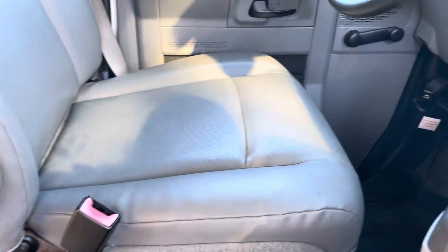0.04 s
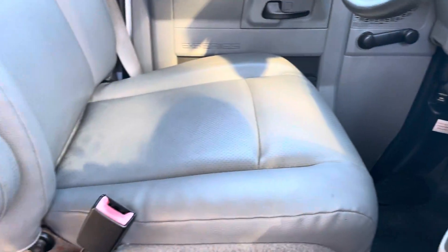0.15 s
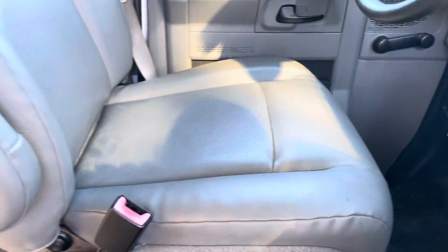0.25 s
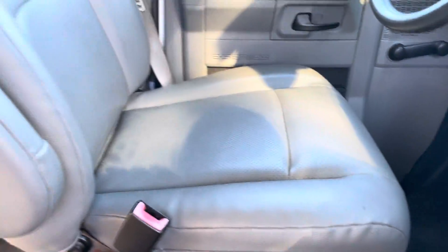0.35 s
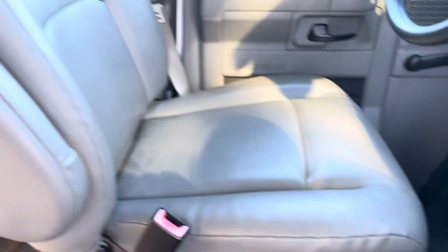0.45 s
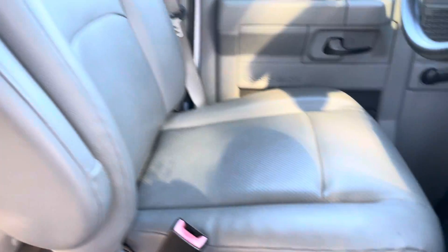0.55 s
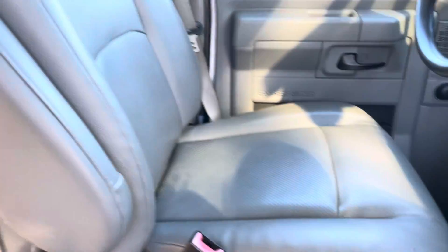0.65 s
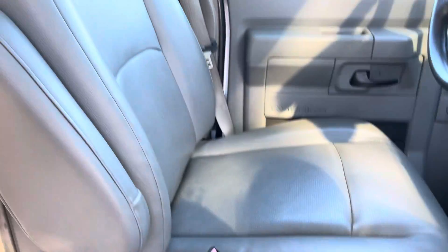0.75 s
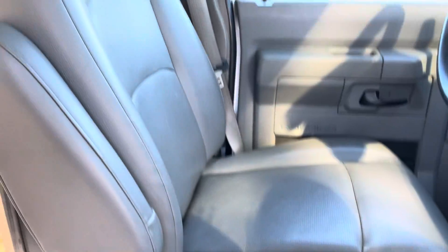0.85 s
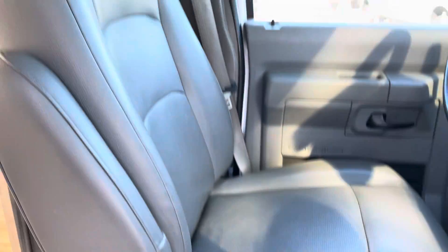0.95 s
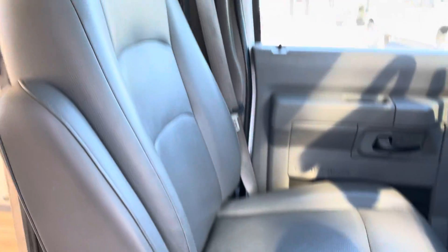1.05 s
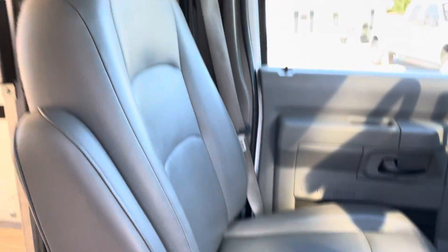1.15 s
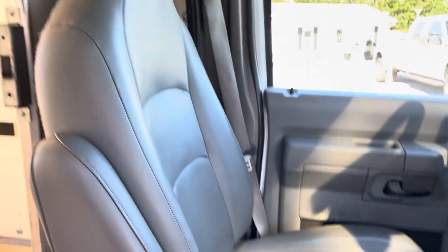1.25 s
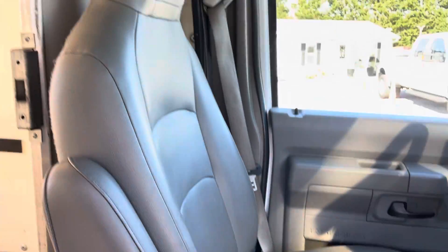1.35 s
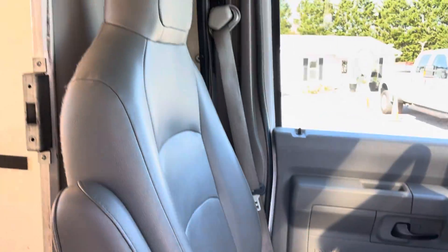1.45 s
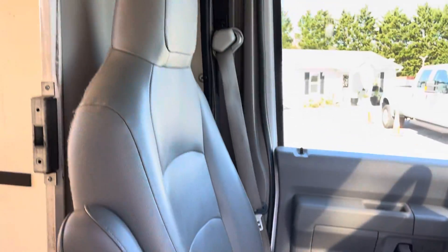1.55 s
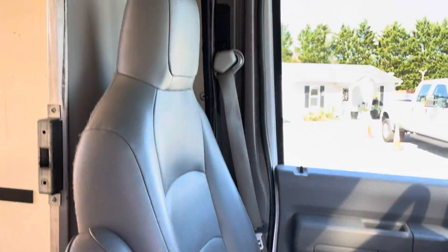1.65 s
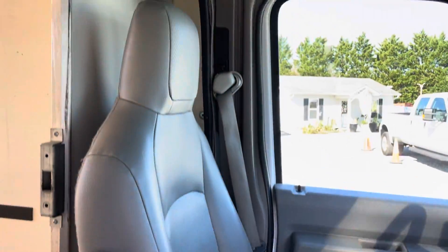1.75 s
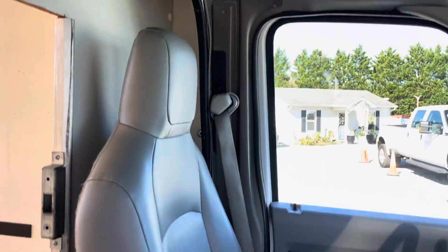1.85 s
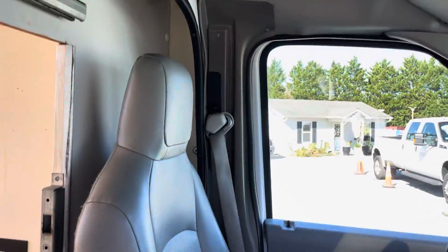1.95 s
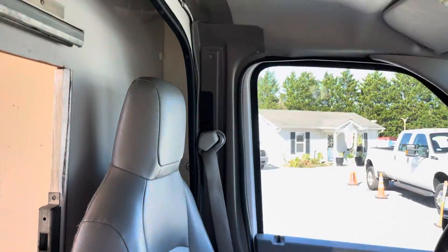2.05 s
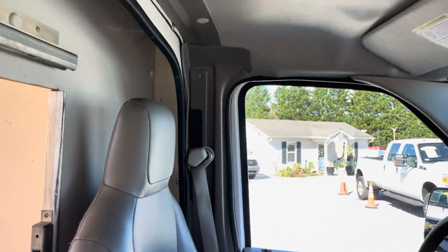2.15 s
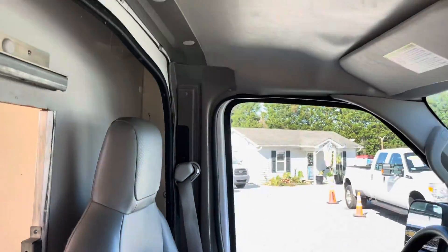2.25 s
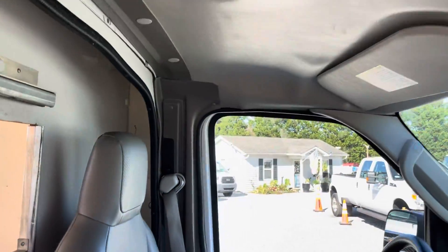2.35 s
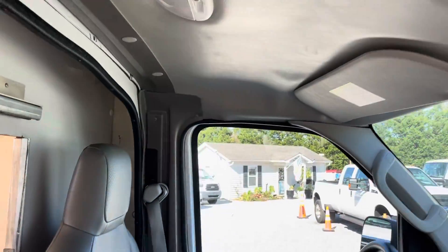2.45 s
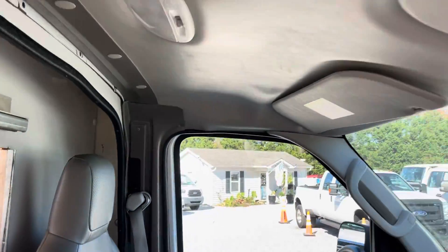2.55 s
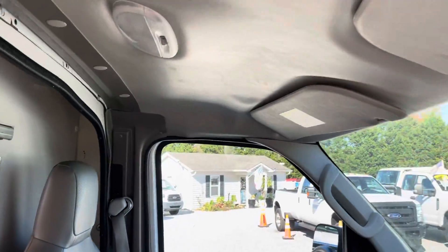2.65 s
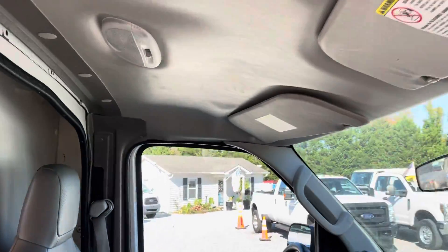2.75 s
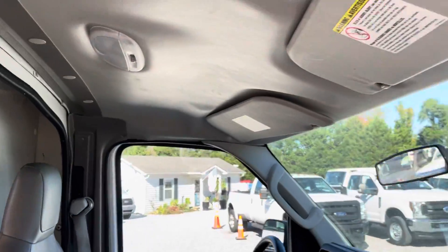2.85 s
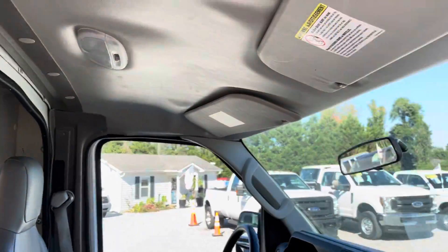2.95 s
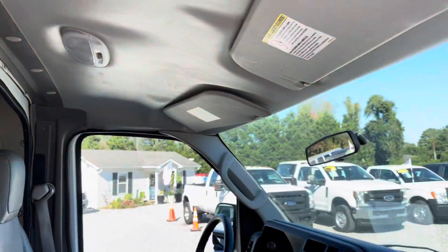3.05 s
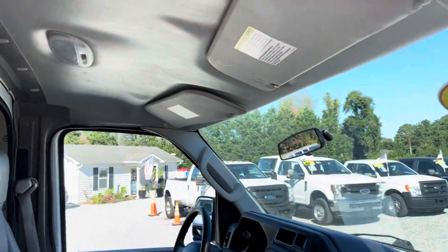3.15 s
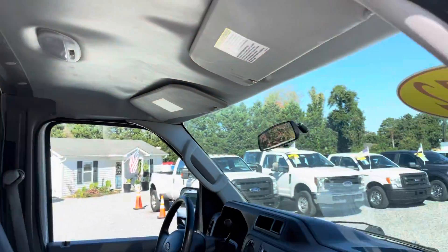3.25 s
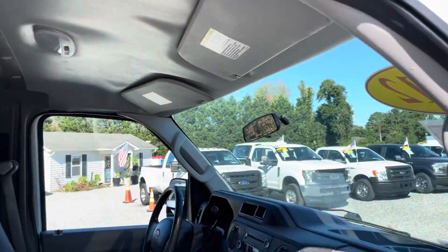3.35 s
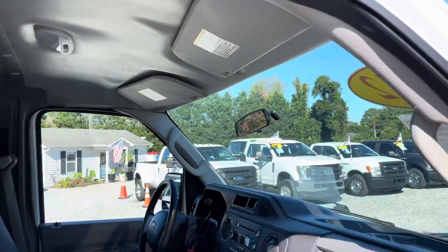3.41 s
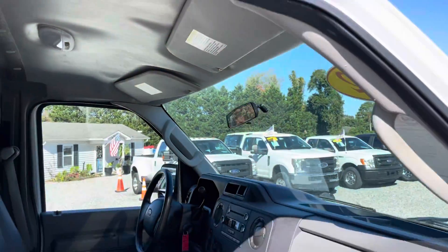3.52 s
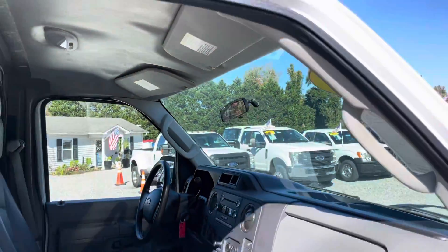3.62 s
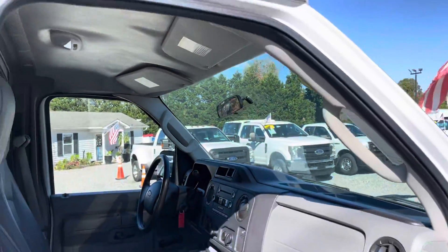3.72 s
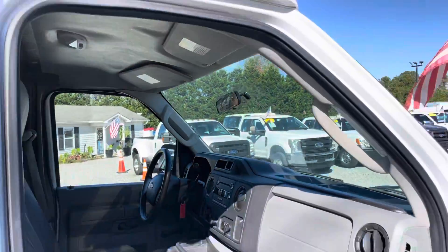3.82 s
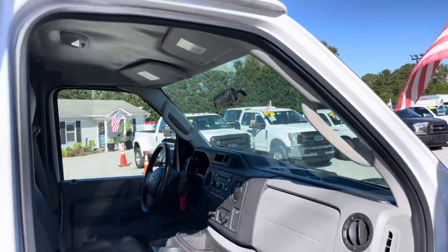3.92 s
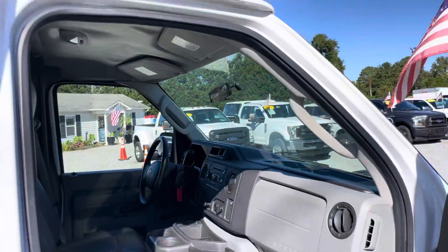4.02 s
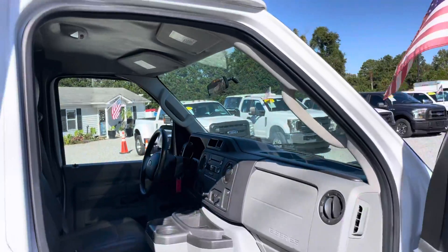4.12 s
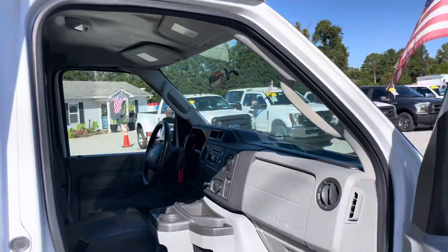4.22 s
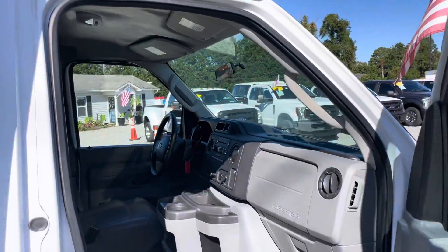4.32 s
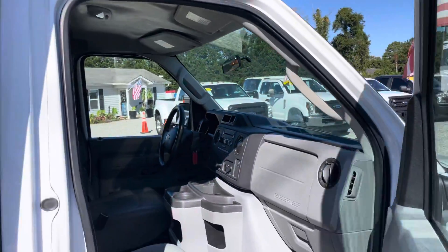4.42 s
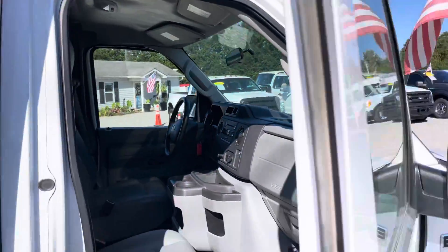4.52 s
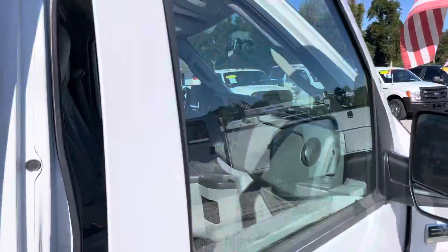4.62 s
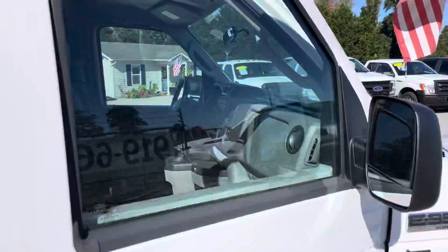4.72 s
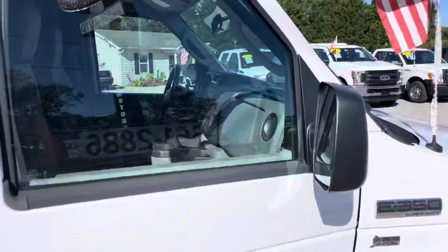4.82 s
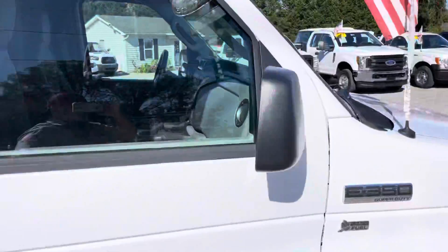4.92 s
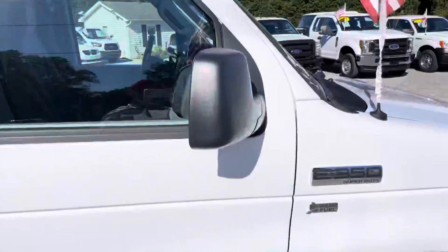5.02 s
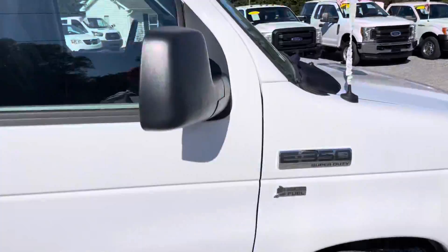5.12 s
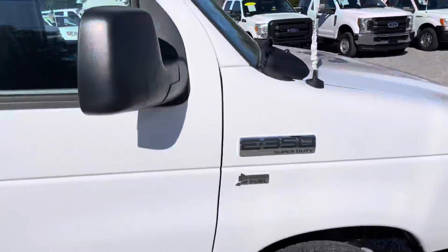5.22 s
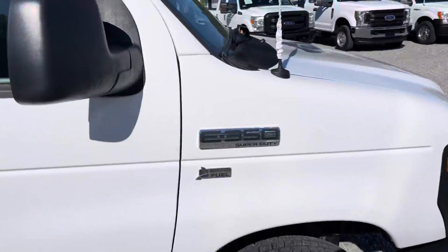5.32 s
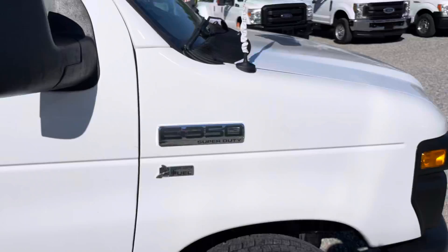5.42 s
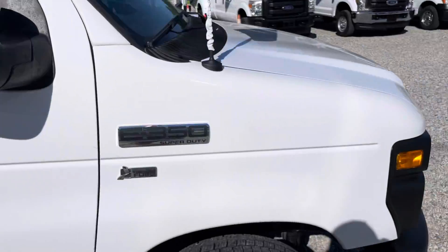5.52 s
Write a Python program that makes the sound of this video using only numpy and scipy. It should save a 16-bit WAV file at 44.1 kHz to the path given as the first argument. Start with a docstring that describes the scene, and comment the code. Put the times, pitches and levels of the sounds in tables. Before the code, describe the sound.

Steady low truck idle, faint rustles and small clicks of someone moving, a loud heavy door slam, then dull bumps and gravel scuffing.

```python
"""A V8 idles on a gravel lot, heard first from inside the open cab of a box truck, then from beside it:
beating low sines, mostly exhaust orders, and hums over filtered noise for rumble, fan rush and hiss.
Someone backs out with small rustles, clicks and steps (noise bursts, grains, struck modes) and slams the door:
the latch cracks and the panel booms (contacts into resonators); a low noise rumble hangs on
while a shoe scuffs the gravel."""
import sys
import numpy as np
from scipy import signal
from scipy.fft import rfft, irfft, next_fast_len
from scipy.io import wavfile

SR = 44100
rng = np.random.default_rng(int(sys.argv[2]) if len(sys.argv) > 2 else 0)


def bounce(signal):
    """Save signal as a 16-bit WAV file at the path given by the first command-line argument."""
    frames = np.transpose(np.atleast_2d(signal))
    limited = np.clip(frames, -1, 1)
    pcm = np.round(limited * 32767).astype(np.int16)
    wavfile.write(sys.argv[1], SR, pcm)


N = 245637
TIME_S = np.arange(N) / SR
SIZE = next_fast_len(N, True)
FREQS_HZ = np.maximum(np.fft.rfftfreq(SIZE, 1 / SR), 1)

# Levels are relative to the other layers, ahead of the ports and limiter; colours are relative.
# Low engine tones, mostly exhaust orders (8 is the firing rate), one accessory hum near 97 Hz:
# multiple_of_cycle, cab_rms_db, outside_rms_db
ENGINE_TONES = [(8.03, -32.5, -35), (10.21, -40.5, -39.5), (11.07, -34.5, -40), (13.1, -38.5, -35),
                (13.97, -43.5, -37), (15.3, -91, -36), (17.27, -47, -40.5), (23.74, -51.5, -44.5),
                (25.82, -54, -42), (26.26, -51, -47.5)]
# Low tones boom in the cab, thin in the doorway: peak_s, half_length_s, change_db
TONE_SWELLS = [(0.647, 0.18, 3), (2.62, 0.69, -1.5)]
# Accessory hums swell and fade as the listener passes through their standing waves: peak_s, half_length_s,
# pitch_hz, peak_rms_db
HUMS = [(2.844, 0.28, 233.4, -43), (3.052, 0.4, 99, -59), (4.166, 0.61, 232.5, -41.5),
        (4.46, 0.28, 190.3, -38)]
# Fan noise grows on the way to the bonnet; only the swing about its mean counts: time_s, level_db
FAN_LEVEL = [(0.0, -52), (0.52, -48.5), (1.27, -51.5), (2.18, -48), (2.56, -48.5), (3.49, -43.5),
             (4.48, -40.5), (4.95, -37)]
# Idle rumble colour: freq_hz, density_db_per_hz
RUMBLE_COLOUR = [(25, -45), (45, 0), (75, -7.5), (110, 2.5), (150, 1.5), (200, -5), (280, -10),
                 (400, -23.5), (800, -104)]
# Fan rush colour: freq_hz, density_db_per_hz
RUSH_COLOUR = [(180, -47), (300, 5), (350, 1.5), (410, 1.5), (520, 2.5), (650, 1), (800, 2), (1000, 1),
               (1400, -10), (2200, -79)]
# Fan hiss colour: freq_hz, density_db_per_hz
HISS_COLOUR = [(800, -11.5), (1250, -1), (1900, -2), (2200, -5), (2650, -9), (3000, -11), (4200, -15.5),
               (5500, -19.5), (7000, -19.5), (8600, -48.5), (10300, -26.5), (13700, -20), (15000, -30.5),
               (16000, -31)]
# Cab resonances, heard only inside: centre_hz, width_octaves, level_db
CAB_RINGS = [(426, 0.22, -55.5), (930, 0.33, -61), (1864, 0.022, -72)]
# Narrow fan bands, heard only outside: centre_hz, width_octaves, level_db
FAN_RINGS = [(405, 0.15, -55), (766, 0.046, -64), (910, 0.12, -54.5), (1104, 0.11, -57), (1413, 0.03, -60),
             (1627, 0.044, -59.5), (1884, 0.038, -62.5), (2586, 0.096, -60)]
# Faint thin squeaks: start_s, length_s, level_db, pitch_hz, glide_hz_per_s, waver_share
SQUEAKS = [(0.187, 0.046, -61, 6500, 1996, 0.026), (0.23, 0.12, -67, 6850, -4000, 0.025),
           (0.25, 0.055, -63.5, 3000, 1200, .005), (0.336, 0.088, -60, 2280, 0, 0.0072),
           (0.29, 0.2, -69, 3150, 0, 0.008)]
# Clicks of fittings and grit: start_s, level_db, centre_hz, width_octaves, t60_s
CLICKS = [(.454, -34, 12500, .8, 0.056), (0.595, -34.5, 9300, 0.76, 0.12), (2.813, -33.5, 5370, 0.85, 0.15),
          (2.94, -23, 1220, 0.43, 0.055), (3.165, -30, 2800, 0.72, 0.034), (4.0159, -36.5, 5570, 1.1, 0.25),
          (4.328, -34, 12000, .8, .03), (4.639, -15, 376, 0.58, 0.16), (4.811, -25, 5800, 1.3, 0.03),
          (4.9093, -29, 10100, 0.66, .025), (4.967, -23, 9800, 0.89, 0.019), (5.125, -32, 11000, 0.6, .02),
          (5.247, -13.5, 1280, 0.58, .04), (5.258, -15, 900, 1.05, 0.07), (5.290, -11.5, 820, 0.73, 0.029),
          (5.339, -16, 780, 1.6, .03), (5.481, -31.5, 10100, 0.73, 0.037)]
# Rubbing of cloth, soles and the closing door: start_s, length_s, level_db, centre_hz, width_octaves
SCUFFS = [(1.57, 0.77, -57.5, 3780, 1.07), (1.68, 0.29, -59.5, 2100, 0.13),
          (1.934, 0.4, -61.5, 12900, 0.35), (2.354, 0.13, -62, 13000, 0.57),
          (3.38, 0.19, -58.5, 9800, 0.53), (3.399, 0.07, -49, 1890, 2.6), (3.39, 0.29, -45.5, 980, 1.23),
          (3.87, .11, -52, 1980, 0.66), (4.177, 0.084, -43, 1070, 0.43), (4.294, 0.15, -42.5, 700, 0.41),
          (4.47, 0.091, -43.5, 990, 0.36), (4.747, 0.19, -40.5, 890, 0.81), (4.966, 0.034, -32, 800, 0.85),
          (4.996, 0.019, -30.5, 1800, 0.35), (5.21, 0.16, -32.5, 300, 0.29)]
# Grit and gravel under a sole: start_s, length_s, level_db, centre_hz, width_octaves, grains_per_s
CRUNCH = [(3.357, 0.17, -48, 1470, 0.9, 220), (4.123, 0.13, -61, 2370, 0.78, 460),
          (4.593, 0.13, -49.5, 2140, 0.84, 540), (5.215, 0.14, -37, 650, 1.5, 400),
          (5.219, 0.18, -44, 1900, 1.5, 1100), (5.25, 0.18, -50.5, 9300, 0.46, 4200)]
# Two light ticks on the trim, then a tight knock and its rebound: start_s, level_db, lowpass_hz
KNOCKS = [(3.3650, -30.5, 7000), (3.4050, -28, 3200), (3.5018, -12, 750), (3.5052, -20.5, 750)]
# Plastic trim modes: pitch_hz, level_db, t60_s
TRIM_MODES = [(786, -10, 0.026), (1130, -1, 0.019), (1520, -3.5, 0.017), (1980, -9, 0.018),
              (2460, -6.5, 0.015), (3210, -11.5, 0.017), (4400, -9, 0.013)]
# Dull handling bumps while walking on: start_s, level_db, pitch_hz, t60_s, stirred_rumble_db
BUMPS = [(5.209, -17, 73, 0.14, -13.5), (5.283, -9, 150, 0.029, -23.5), (5.405, -7.5, 64, 0.092, -23.5),
         (5.511, -12, 73, 0.038, -25)]
# Seal closes, door rocks against it: start_s, level_db
SEAL_PUSHES = [(5.0231, 10.5), (5.0800, 7.5)]
# Cab air squeezed by the door, modes: pitch_hz, level_db, t60_s
CAB_MODES = [(48, -13.5, 0.31), (73, -13, 0.19), (118.4, -23, 0.37), (183.5, -18, 0.32)]
# Low rumble around the slam, colour: freq_hz, density_db_per_hz
SLAM_RUMBLE_COLOUR = [(22, -27), (45, -3), (75, 10), (110, 0), (150, 4), (190, 2), (238, -7), (295, -7),
                      (375, -11.5), (490, -15.5), (720, -18.5), (1500, -64)]
# Latch rides up the striker, then snaps over it: start_s, level_db, lowpass_hz
LATCH_HITS = [(4.9994, 5, 650), (5.0030, -10, 1800), (5.0062, -12, 1980), (5.0099, -8.5, 9000),
              (5.0152, -11, 7000), (5.0435, -13, 3000)]
# Steel latch modes: pitch_hz, level_db, t60_s
LATCH_MODES = [(960, -10, 0.0088), (1890, -24.5, 0.072), (2550, -41, 0.027), (3300, -21, 0.016),
               (3995, -17, 0.022), (5330, -32, 0.07), (6540, -23.5, 0.069), (7350, -23, 0.044)]
# Door meets frame, its panels rattle on: start_s, level_db, lowpass_hz
SLAM_HITS = [(5.0096, -6, 8900), (5.0110, -8, 3970), (5.0148, -4, 900), (5.0190, -18.5, 3500),
             (5.042, -8.5, 1000), (5.0480, -7.5, 1200), (5.082, -6, 230), (5.129, -9.5, 420)]
# Door skin modes: pitch_hz, level_db, t60_s
DOOR_MODES = [(200.6, -12.5, 0.069), (292, -28, 0.25), (386.6, -17, 0.25), (420, -17, 0.18),
              (555, -20, 0.05), (706, -10.5, 0.027), (784, -19.5, 0.16), (880, -21, 0.12),
              (1000, -26, 0.13), (1190, -25, 0.1), (1363, -23, 0.08), (1470, -27.5, 0.1),
              (1710, -25, 0.089), (2730, -29, 0.044)]
# Crack colour of each contact: freq_hz, density_db_per_hz
CRACK_COLOUR = [(100, 2), (400, 0), (650, 6.5), (1100, -2.5), (2200, -13.5), (3200, -14), (4100, -18.5),
                (4800, -17), (7200, -34), (8500, -40.5), (11000, -25), (13500, -23.5), (16000, -24)]
# Side against mid at the two microphone ports: freq_hz, ratio_db
PORT_WIDTH = [(40, -10), (90, -14), (200, -5), (380, -4.5), (550, -1.5), (800, 2), (1200, 1), (2200, -2.5),
              (4300, -1.5), (6400, -5.5), (8500, 22.5), (10500, 6.5), (12500, -12), (15000, -53)]
# Diffuse share of the port difference, ahead of each source's spread: freq_hz, share_db
PORT_DIFFUSE = [(60, -1), (500, -3), (1000, -3), (2200, -.5), (4000, -1.5), (9000, -2), (13000, 1)]
# Left over right: freq_hz, ratio_db
PORT_LEAN = [(50, 0.7), (125, -1.8), (250, 0.5), (500, 0.5), (1000, -0.5), (2000, -1), (4000, 5),
             (8000, -0.5), (13000, -0.5)]

CYCLE_HZ, TONES_DB = 5.62, 0.1
WAVER_DB, HUNT_S = 1.2, .0003   # rms unevenness of the idle: level, timing
RUMBLE_DB, RUMBLE_FOLLOWS = -38.5, 0.63   # level at mean swing; share of the fan's swing in dB
RUSH_DB, RUSH_FOLLOWS, RUSH_WAVER_DB, RUSH_RIPPLE = -47, 0.99, .6, .09
HISS_DB, HISS_FOLLOWS = -51.5, 0.8
RING_WAVER_DB, RING_FOLLOWS = 3, 0.77
CAB_PAN_DB, OUTSIDE_PAN_DB = -.9, .4   # engine, left over right
LEAVE_S, LEAVE_TAKES_S = 2.07, 0.94   # backing out of the cab
GRIT_PER_S, GRIT_DB = 30, -73
SWEEP_S, SWEEP_LENGTH_S, SWEEP_DB = 4.905, 0.055, -23   # air pushed past by the swinging door
HANG_DB, HANG_T60_S = -12.5, 1.02   # rumble that hangs on after the slam
RUMBLE_ATTACK_S, BUMP_RUMBLE_T60_S = 0.0049, 0.98
DOOR_DB, MODE_SCATTER_DB = 1.5, 5   # force of the slam; chance in how each contact excites each mode
CRACK_T60_S, LOOSE_DB, LOOSE_T60_S = .025, -15, 0.37
LIMIT_DB, RECOVER_DB_PER_S, LIMIT_ATTACK_HZ = -4.5, 29.5, 15
FULL_SCALE, CUTOFF_HZ = .95, 15900


def from_db(db):
    """Decibels to gain."""
    return 10 ** (np.asarray(db) / 20)


def rms_one(x):
    """Scale to unit rms."""
    return x / np.sqrt(np.mean(x ** 2) + 1e-20)


def gains(points):
    """Frequency and dB rows as a gain for every frequency."""
    hz, db = np.transpose(points)
    return from_db(np.interp(np.log(FREQS_HZ), np.log(hz), db))


def hump(hz, octaves):
    """A bell-shaped band on the octave scale."""
    return np.exp(-(np.log2(FREQS_HZ / hz) / octaves) ** 2)


def shaped(x, response):
    """Filter by a gain for every frequency."""
    return irfft(rfft(x, SIZE) * response, SIZE)[..., :N]


def drift(hz):
    """Low-passed chance of unit rms."""
    return rms_one(shaped(rng.standard_normal(N), 1 / (1 + (FREQS_HZ / hz) ** 2)))


def noise(colour, grain_db=0):
    """Two unrelated coloured noises of unit rms; grain makes some instants stand out."""
    white = rng.standard_normal((2, N))
    if grain_db:
        white *= from_db(grain_db * np.minimum(rng.exponential(1, N), 6))
    return rms_one(shaped(white, colour))


def grains(per_s, colour):
    """Two unrelated streams of small random impacts, unit rms."""
    sizes = rng.standard_normal((2, N))
    hits = rng.random((2, N)) < per_s / SR
    return rms_one(shaped(sizes * hits, colour))


def click_at(s):
    """A unit click at s."""
    return np.arange(N) == round(s * SR)


def ring(force, hz, t60_s):
    """Two-pole resonator: a unit click sets a decaying sine of height 1 ringing."""
    r, w = from_db(-60 / (t60_s * SR)), 2 * np.pi * hz / SR
    return signal.lfilter([0, np.sin(w)], [1, -2 * r * np.cos(w), r * r], force + 1e-18)


def soften(x, hz):
    """One-pole low-pass: a softer contact."""
    r = np.exp(-2 * np.pi * hz / SR)
    return signal.lfilter([1 - r], [1, -r], x + 1e-18)


def struck(hits, modes, count):
    """Contacts, softened count times, ring a body's modes, each with a strength of its own."""
    taps = []
    for s, db, lowpass_hz in hits:
        tap = from_db(db) * click_at(s)
        for _ in range(count):
            tap = soften(tap, lowpass_hz)
        taps.append(tap)
    strengths = from_db(MODE_SCATTER_DB * rng.standard_normal((len(modes), len(hits))))
    forces = strengths @ np.array(taps)
    out = np.zeros(N)
    for k, (force, (hz, db, t60_s)) in enumerate(zip(forces, modes)):
        out += (-1) ** k * from_db(db) * ring(force, hz, t60_s)   # alternate modes are inverted
    return out


def bell(s, half_s):
    """A smooth swell that peaks at s."""
    return np.exp(-((TIME_S - s) / half_s) ** 2)


def stroke(s, length_s):
    """An envelope that rises and falls as half a sine."""
    return np.sin(np.pi * np.clip((TIME_S - s) / length_s, 0, 1))


def dying(s, t60_s):
    """An envelope that starts at s and falls 60 dB in t60_s."""
    return (TIME_S >= s) * np.exp(-np.log(1000) * np.clip((TIME_S - s) / t60_s, 0, 10))


def surge(s, t60_s):
    """A dying envelope with a soft attack."""
    return dying(s, t60_s) * np.clip((TIME_S - s) / RUMBLE_ATTACK_S, 0, 1)


def panels(strength, count=10):
    """Echoes off nearby body panels ripple the spectrum."""
    lags_s = rng.uniform(0.001987, .025, count)
    echoes = sum(np.exp(-2j * np.pi * FREQS_HZ * lag_s) for lag_s in lags_s)
    return abs(1 + strength * echoes)


def ports(direct, diffuse, spread):
    """Two close ports: their difference is the pressure gradient, a quarter cycle off, plus diffuse sound."""
    share = np.clip(spread * gains(PORT_DIFFUSE) ** 2, 0, 1)
    ends = signal.windows.tukey(N, .002)
    mid = rfft(direct * ends, SIZE)
    gradient = -1j * np.sqrt(1 - share) * mid
    side = gains(PORT_WIDTH) * (gradient + np.sqrt(share) * rfft(diffuse * ends, SIZE))
    lean = np.sqrt(gains(PORT_LEAN))
    return irfft(np.array([(mid - side) * lean, (mid + side) / lean]), SIZE)[:, :N]


def pickup():
    """Colour that offsets the gain of the port difference."""
    return 1 / (1 + gains(PORT_WIDTH))


def pan(x, db):
    """Make the left side db louder than the right."""
    return np.array([x[0] * from_db(db / 2), x[1] * from_db(-db / 2)])


def outside_share():
    """0 inside the cab, 1 once out of it."""
    return np.clip((TIME_S - LEAVE_S) / LEAVE_TAKES_S, 0, 1)


def fan_swing_db():
    """Fan level about its own mean, in dB."""
    s, level_db = np.transpose(FAN_LEVEL)
    db = np.interp(TIME_S, s, level_db)
    return db - db.mean()


def engine_tones(outside):
    """Low sines, mostly exhaust orders with one accessory hum near 97 Hz, beat over swelling accessory hums."""
    swell_db = TONES_DB + sum(db * bell(s, half_s) for s, half_s, db in TONE_SWELLS)
    clock_s = TIME_S + HUNT_S * drift(0.84)   # the idle hunts slightly
    lines = []
    for multiple, cab_db, open_db in ENGINE_TONES:
        level_db = swell_db + cab_db + outside * (open_db - cab_db)
        lines.append((multiple * CYCLE_HZ, from_db(level_db)))
    for s, half_s, hz, db in HUMS:
        lines.append((hz, from_db(db) * bell(s, half_s)))
    tones = np.zeros(N)
    for hz, gain in lines:
        sine = np.sqrt(2) * np.sin(2 * np.pi * (hz * clock_s + rng.random()))
        tones += gain * from_db(WAVER_DB * drift(1.4)) * sine
    return tones


def engine_air(outside):
    """Rumble, rush and hiss noise grow together as the fan gets nearer; narrow bands ring in the cab or outside."""
    near_db = fan_swing_db()
    rush_db = RUSH_DB + RUSH_FOLLOWS * near_db + RUSH_WAVER_DB * drift(1.9)
    hiss_db = HISS_DB + HISS_FOLLOWS * near_db + 0.89 * drift(44)
    air = from_db(RUMBLE_DB + RUMBLE_FOLLOWS * near_db) * noise(gains(RUMBLE_COLOUR))
    air += from_db(rush_db) * noise(gains(RUSH_COLOUR) * panels(RUSH_RIPPLE))
    air += from_db(hiss_db) * noise(gains(HISS_COLOUR) * panels(0.11))
    for hz, octaves, db in CAB_RINGS:
        air += from_db(db) * (1 - outside) * noise(hump(hz, octaves))
    growth_db = RING_FOLLOWS * (near_db - near_db[outside == 1].mean())
    for hz, octaves, db in FAN_RINGS:
        ring_db = db + growth_db + RING_WAVER_DB * drift(9.6)   # each band wavers by itself
        air += from_db(ring_db) * outside * noise(hump(hz, octaves))
    return air


def engine():
    """Engine tones and air at both ports, leaning slightly right in the cab, slightly left once outside."""
    outside = outside_share()
    air = engine_air(outside)
    pan_db = CAB_PAN_DB + outside * (OUTSIDE_PAN_DB - CAB_PAN_DB)
    return pan(ports(engine_tones(outside) + air[0], air[1], 1.0), db=pan_db)


def squeaks():
    """Short gliding sines with an unsteady pitch."""
    out, waver = np.zeros(N), drift(120)
    for s, length_s, db, hz, glide_hz_per_s, share in SQUEAKS:
        glide_hz = glide_hz_per_s * np.clip(TIME_S - s, 0, length_s)
        pitch_hz = (hz + glide_hz) * (1 + share * waver)
        sine = np.sqrt(2) * np.sin(2 * np.pi * np.cumsum(pitch_hz) / SR)
        out += from_db(db) * stroke(s, length_s) * sine
    return out


def clicks():
    """Fittings and grit click as dying bursts of band noise."""
    out = np.zeros((2, N))
    for s, db, hz, octaves, t60_s in CLICKS:
        out += from_db(db - 16) * soften(dying(s, t60_s), 900) * noise(hump(hz, octaves) * pickup())
    return out


def scuffs():
    """Rubbing is grainy band noise whose level flickers as it catches and slips."""
    out, catching = np.zeros((2, N)), from_db(0.69 * drift(29))
    for s, length_s, db, hz, octaves in SCUFFS:
        rub = noise(hump(hz, octaves) * pickup(), grain_db=2.0)
        out += from_db(db) * stroke(s, length_s) * catching * rub
    return out


def stray_grit():
    """Outside, stones shift underfoot at random: softened impulses open a noise."""
    stones = rng.random(N) < GRIT_PER_S * outside_share() / SR
    envelope = rms_one(soften(stones * rng.random(N), 30))
    return from_db(GRIT_DB) * envelope * noise(hump(10800, 3.6) * pickup())


def gravel_crunch():
    """Grit grinds under a sole as a burst of small random impacts."""
    out = np.zeros((2, N))
    for s, length_s, db, hz, octaves, per_s in CRUNCH:
        out += from_db(db) * stroke(s, length_s) * grains(per_s, hump(hz, octaves) * pickup())
    return out


def knocks():
    """Soft contacts ring the plastic trim's short modes."""
    return struck(KNOCKS, TRIM_MODES, count=2)


def bumps():
    """Each dull bump is a softened click ringing one low mode."""
    out = np.zeros(N)
    for s, db, hz, t60_s, _ in BUMPS:
        out += from_db(db) * ring(soften(click_at(s), 260), hz, t60_s)
    return out


def movements():
    """Sounds of the person moving: tonal ones arrive direct, noises also diffuse."""
    rustle = clicks() + scuffs() + stray_grit() + gravel_crunch()
    return ports(rustle[0] + squeaks() + knocks() + bumps(), rustle[1], 0.53)


def boom():
    """Door sweeps air ahead, the seal closes and the cab air booms; low rumble hangs on, stirred by each bump."""
    push = soften(sum(from_db(db) * click_at(s) for s, db in SEAL_PUSHES), 450)
    push = soften(push, 400)
    cab = sum(from_db(db) * ring(push, hz, t60_s) for hz, db, t60_s in CAB_MODES)
    swells = [from_db(SWEEP_DB) * stroke(SWEEP_S, SWEEP_LENGTH_S),
              from_db(HANG_DB) * surge(SEAL_PUSHES[0][0], HANG_T60_S)]
    for s, _, _, _, rumble_db in BUMPS:
        swells.append(from_db(rumble_db) * surge(s, BUMP_RUMBLE_T60_S))
    envelope = np.linalg.norm(swells, axis=0) * from_db(1.3 * drift(25))   # powers add
    rumble = envelope * noise(gains(SLAM_RUMBLE_COLOUR) * panels(0.11))
    return pan(ports(cab + rumble[0], from_db(-6.5) * rumble[1], 1.7), db=1.0)


def door_crack():
    """Each contact cracks as a short noise burst; loose parts inside the door rattle on."""
    out = np.zeros((2, N))
    for s, db, lowpass_hz in SLAM_HITS:
        burst = from_db(db) * dying(s, CRACK_T60_S) * rng.standard_normal((2, N))
        out += soften(burst, lowpass_hz)
    rattle = from_db(LOOSE_DB) * dying(SLAM_HITS[0][0], LOOSE_T60_S) * from_db(2.3 * drift(90))
    out += rattle * rng.standard_normal((2, N))
    return from_db(-4.5) * shaped(out, rms_one(gains(CRACK_COLOUR)))


def door():
    """Steel latch snaps over its striker while quick door-frame contacts crack and ring the skin."""
    crack = door_crack()
    metal = struck(SLAM_HITS, DOOR_MODES, count=1) + struck(LATCH_HITS, LATCH_MODES, count=2)
    echo = np.roll(metal, round(.0023 * SR))   # off the side of the truck
    diffuse = from_db(-1.5) * crack[1] + from_db(-7) * echo
    return from_db(DOOR_DB) * pan(ports(metal + crack[0], diffuse, 4.5), db=1.5)


def limiter(x):
    over_db = np.maximum(20 * np.log10(abs(x).max(axis=0) + 1e-9) - LIMIT_DB, 0)
    recovery_db = RECOVER_DB_PER_S * TIME_S
    cut_db = np.maximum.accumulate(over_db + recovery_db) - recovery_db
    return np.clip(x * from_db(-soften(cut_db, LIMIT_ATTACK_HZ)), -FULL_SCALE, FULL_SCALE)


def scene():
    """Everything at the microphone."""
    return engine() + movements() + boom() + door()


def record(dry):
    """The microphone sheds the deepest bass, a limiter ducks under the slam, the top is cut."""
    bass_cut = signal.butter(3, 32, "high", fs=SR, output="sos")
    top_cut = signal.ellip(10, .1, 80, CUTOFF_HZ, fs=SR, output="sos")
    return signal.sosfilt(top_cut, limiter(signal.sosfilt(bass_cut, dry)))


dry = scene()
out = record(dry)
bounce(out)
```